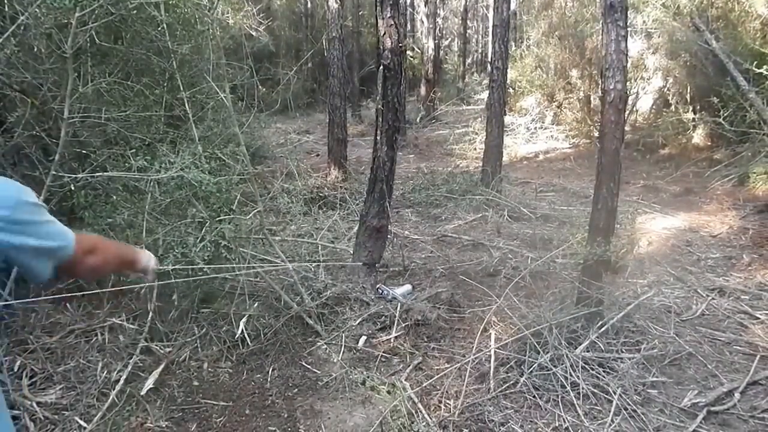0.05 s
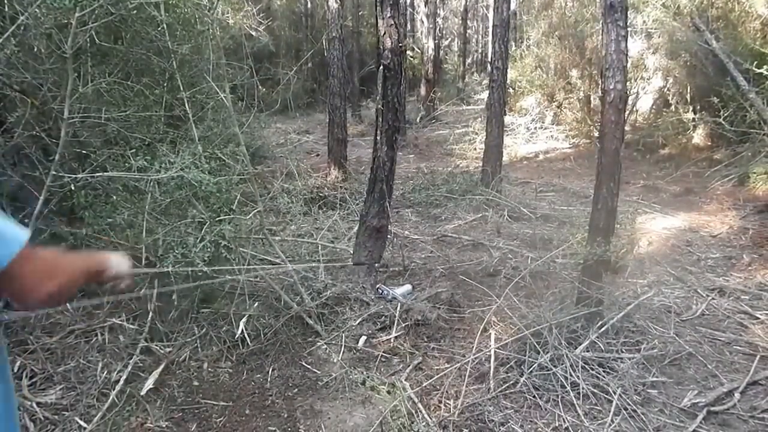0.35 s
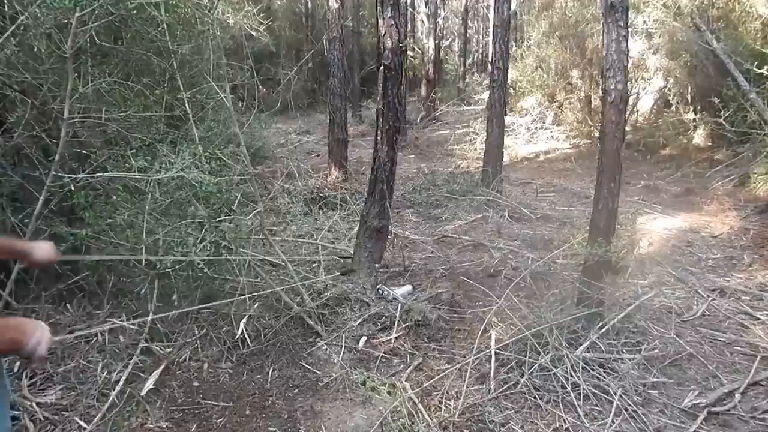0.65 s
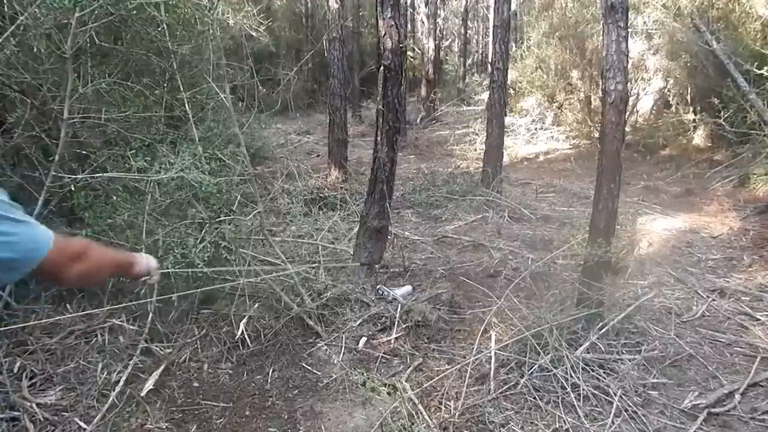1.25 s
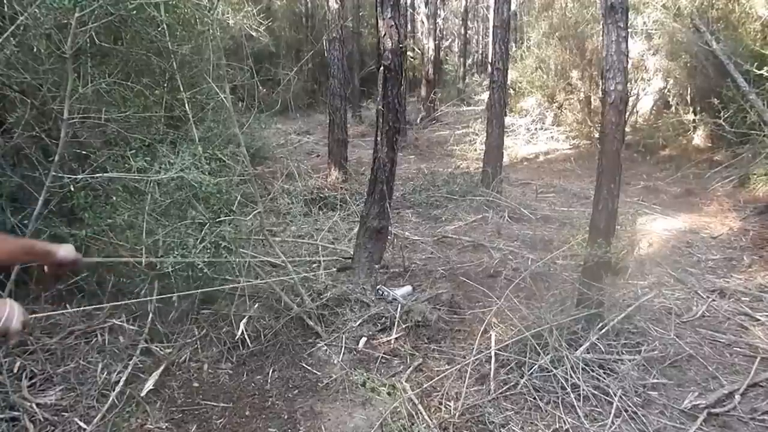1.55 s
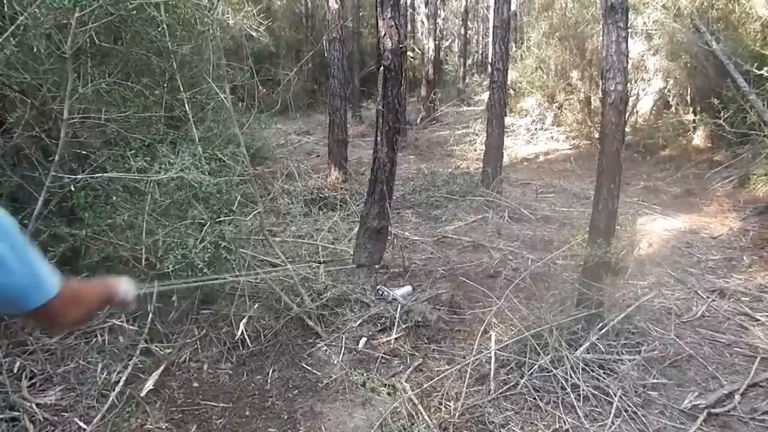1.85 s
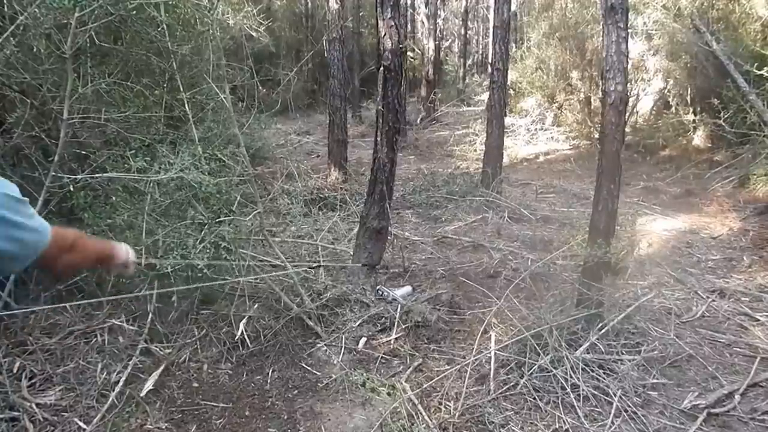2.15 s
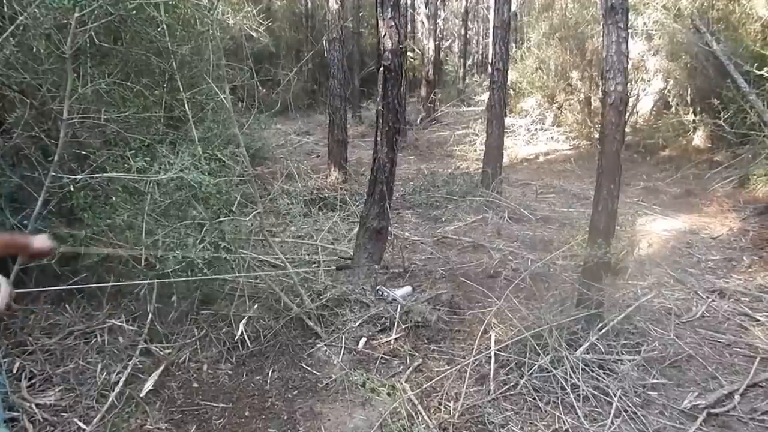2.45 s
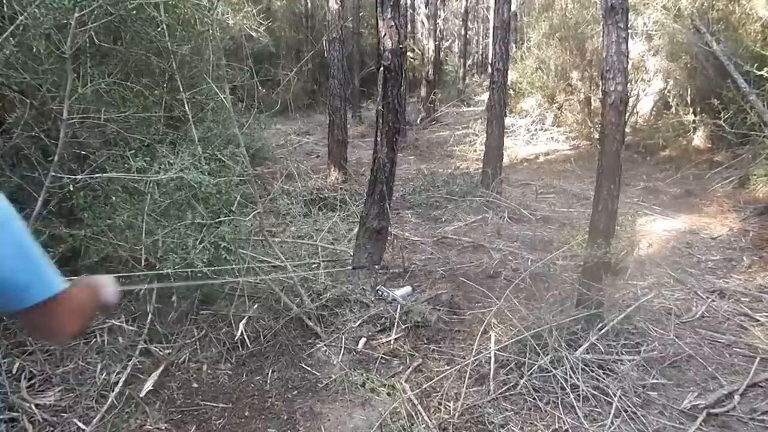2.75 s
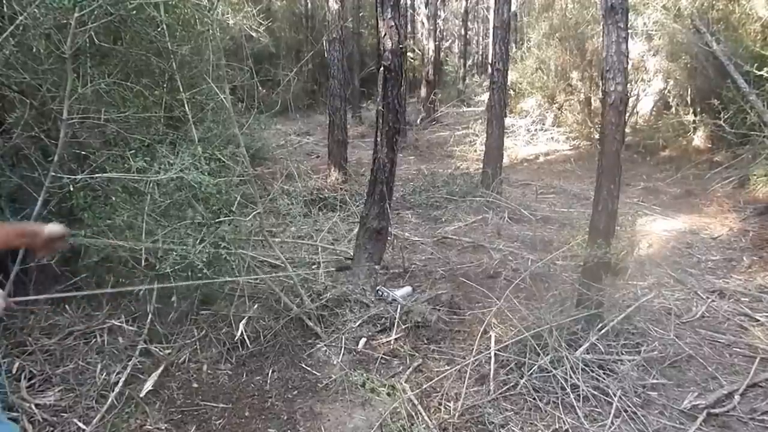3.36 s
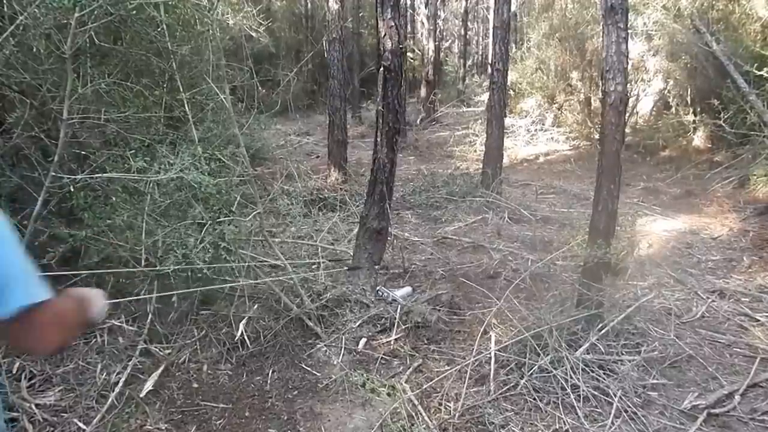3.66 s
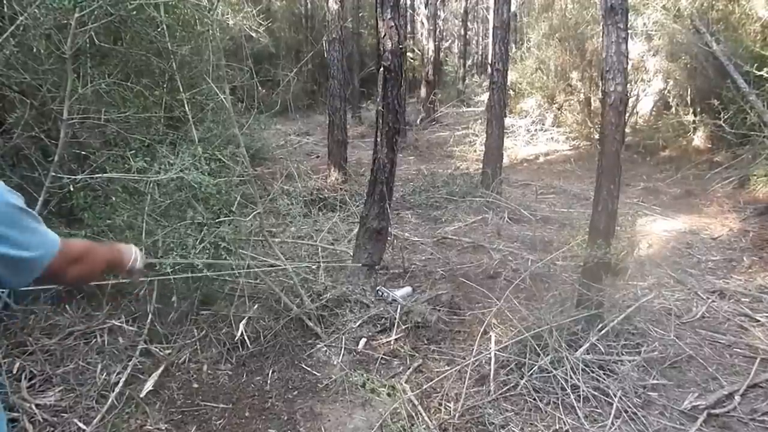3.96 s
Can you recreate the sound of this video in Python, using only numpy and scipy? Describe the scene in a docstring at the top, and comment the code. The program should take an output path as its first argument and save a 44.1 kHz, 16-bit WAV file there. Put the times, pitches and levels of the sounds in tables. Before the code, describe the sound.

A rope-pulled chain saw rasps back and forth through a tree trunk in quiet woods.

```python
"""Rope saw on a pine

Quiet woodland, stereo microphones on a camera a few metres from a pine. A rope-pulled chain saw is
drawn to and fro round the foot of the tree. On each pull the chain chatters in the cut about 200 times
a second: every bite clinks the links and knocks the trunk, fibres tear in between, and now and then
a tooth snags hard. Behind it lie faint echoes, a soft rush of air and the camera's thin steady whine."""
import sys
import numpy as np
from scipy import signal
from scipy.fft import rfft, irfft
from scipy.io import wavfile

SR = 44100
rng = np.random.default_rng(int(sys.argv[2]) if len(sys.argv) > 2 else 0)


def put_to_file(sound):
    """Save the sound as 16-bit audio at rate SR, in the file named by the first command-line argument."""
    columns = np.atleast_2d(sound).T  # one column per channel
    safe = np.clip(columns, -1, 1)
    whole_steps = np.round(safe * 32767)
    wavfile.write(sys.argv[1], SR, whole_steps.astype(np.int16))


N = 176400

# The trunk's answer to a knock: f/Hz, level/dB
TRUNK = [(60, -42.5), (140, -28.5), (165, 1), (200, -4.5), (290, 3.5), (350, -5), (400, -2), (435, -10),
         (505, -6.5), (570, -13.5), (630, -9.5), (690, -6.5), (800, -12.5), (940, -7.5), (1300, -15.5),
         (1800, -22.5), (4000, -70.5)]
# Hard snags: t/s, strength/dB, link ring/dB, crack/dB (crack minus ring sets the brightness)
SNAGS = [(0.2704, -27, -31, -43), (0.3033, -19.5, -35, -34), (0.3212, -23, -37, -32),
         (0.3451, -24, -31, -38), (0.5096, -13.5, -26, -29), (0.627, -27.5, -41, -45),
         (0.734, -53, -35, -41), (0.7652, -28.5, -36, -27), (0.7956, -24.5, -31.5, -30),
         (0.9024, -13, -23.5, -19.5), (0.9901, -11, -22.5, -22), (1.0376, -15.5, -33, -24),
         (1.3898, -14.5, -28, -26.5), (1.4439, -20, -24.5, -32), (1.4696, -15, -20, -34),
         (1.495, -12, -23, -24), (1.5263, -14.5, -34.5, -15.5), (1.7679, -15, -22.5, -23),
         (1.7933, -19.5, -28, -26), (1.8098, -15.5, -26.5, -28), (1.8462, -13.5, -22, -28.5),
         (1.8844, -13, -27, -24), (1.9065, -12.5, -19, -16), (1.9293, -11, -23, -20),
         (1.94, -9.5, -24, -18), (1.9514, -14, -30, -28), (2.0346, -20.5, -30, -28),
         (2.0625, -30, -44, -36), (2.3615, -12, -26, -19), (2.384, -15, -30, -22),
         (2.4395, -11.5, -23.5, -15), (2.4592, -16.5, -30, -25), (2.5476, -26.5, -38, -44),
         (2.7077, -14, -14, -47), (2.7352, -19, -28, -28), (2.7414, -26, -32, -5), (2.7755, -14, -21, -26),
         (2.8183, -12, -25, -28), (2.8686, -15, -20, -24), (2.9197, -15.5, -36.5, -17),
         (2.9716, -33, -46, -39), (3.1105, -31, -39, -47), (3.1333, -29.5, -34.5, -40),
         (3.1592, -25, -22, -47), (3.274, -11.5, -29.5, -20), (3.2983, -20, -27, -29),
         (3.3257, -13.5, -27, -24), (3.4457, -22, -37, -38), (3.585, -29.5, -35, -43),
         (3.7425, -15, -25, -25), (3.914, -21.5, -34, -46)]


def amp(db):
    """Decibels to gain."""
    return 10 ** (np.asarray(db) / 20)


def unit(x):
    """Scales to rms 1."""
    return x / np.sqrt(np.mean(x ** 2) + 1e-20)


def read(points, hz):
    """Reads a table on a log-frequency axis."""
    f, value = np.transpose(points)
    return np.interp(np.log(hz + 1), np.log(f + 1), value)


def add(mix, s, sound):
    """Adds a sound at time s."""
    part = mix[max(round(s * SR), 0):][:len(sound)]
    part += sound[:len(part)]


def colour(x, points, tilt_db=0, size=4096):
    """Minimum-phase filter with the given spectrum, tilted by tilt_db an octave about 3 kHz."""
    hz = np.abs(np.fft.fftfreq(size, 1 / SR))
    octaves = np.log2(np.clip(hz, 1200, 9000) / 3000)
    log_gain = np.log(amp(read(points, hz) + tilt_db * octaves))
    taps = np.fft.ifft(np.exp(np.conj(signal.hilbert(log_gain)))).real[:size // 2]
    return signal.oaconvolve(x, taps)[:len(x)]


def low_cut(x, hz, order):
    """Zero-phase high-pass filter."""
    return signal.sosfiltfilt(signal.butter(order, hz, "high", fs=SR, output="sos"), x)


def drift(width_hz):
    """Complex noise that wanders within the given bandwidth."""
    hz = np.fft.fftfreq(N, 1 / SR)
    white = rng.standard_normal(N) + 1j * rng.standard_normal(N)
    z = np.fft.ifft(np.fft.fft(white) / (1 + (2 * hz / width_hz) ** 2) ** 1.5)
    return z / np.std(z)


def arm(firm_rasp_db=-29, firm_chatter_db=-26, sag_oct_per_s=1.1):
    """Effort on the chain and load on the cut (1 on a firm pull), and the chatter's pitch in Hz."""
    # The swell of the stroke, one list a pull: t/s, rasp level/dB, chatter level/dB
    pulls = [
        [(0.0, -33.5, -35), (0.03, -32, -29), (0.05, -32, -30), (0.16, -65, -59.5)],
        [(0.2, -61, -58), (0.3, -42, -42), (0.38, -40, -33), (0.43, -37.5, -35), (0.5, -35.5, -28),
         (0.58, -38, -34), (0.69, -64, -54)],
        [(0.71, -66, -54), (0.74, -45, -46), (0.81, -40, -37), (0.91, -30.5, -27), (0.96, -32.5, -29),
         (1.04, -32, -30), (1.17, -67, -57.5)],
        [(1.21, -65, -61), (1.29, -42.5, -42), (1.39, -31, -29), (1.44, -27.5, -25), (1.49, -30.5, -24),
         (1.54, -33.5, -28.5), (1.67, -63, -55)],
        [(1.69, -59, -54), (1.77, -39.5, -37), (1.82, -33, -34), (1.94, -27.5, -28), (2.04, -40, -38),
         (2.07, -51, -47), (2.12, -64, -67.5)],
        [(2.16, -62, -62), (2.23, -50.5, -45), (2.33, -32.5, -28), (2.43, -28.5, -26), (2.48, -32, -27),
         (2.53, -40.5, -39), (2.6, -66.5, -53)],
        [(2.62, -59.5, -56), (2.72, -35.5, -36), (2.8, -27.5, -28), (2.87, -29, -26), (2.92, -32, -29),
         (2.97, -44, -37), (3.04, -64, -60.5)],
        [(3.07, -60, -59.5), (3.15, -42, -43), (3.25, -34.5, -27), (3.3, -29, -27), (3.37, -31.5, -23),
         (3.45, -42.5, -34), (3.51, -69, -57)],
        [(3.54, -62, -57.5), (3.59, -50.5, -48), (3.69, -31.5, -30.5), (3.79, -28, -25), (3.87, -38.5, -36),
         (3.92, -51, -41), (3.99, -66, -62)],
    ]
    # Chatter pitch at the loud middle of each pull: f/Hz
    pitches = [199.17, 227.7, 189.76, 207.5, 215.2, 225.9, 216.3, 236.4, 235]
    t = np.arange(N) / SR
    hz = np.full(N, float(pitches[0]))
    for pull, pitch_hz in zip(pulls, pitches):
        times, _, level_db = np.transpose(pull)
        middle = np.average(times, weights=amp(level_db) ** 2)
        begun = t >= times[0]
        # the chatter slows as the chain digs in
        hz[begun] = pitch_hz * 2 ** (-sag_oct_per_s * np.clip(t[begun] - middle, -.2, .06))
    s, rasp_db, chatter_db = np.concatenate(pulls).T
    effort = amp(np.interp(t, s, rasp_db) - firm_rasp_db)
    load = amp(np.interp(t, s, chatter_db) - firm_chatter_db)
    return effort, load, hz


def chatter(hz, evenness=0.27):
    """The chain grabs and slips at an unsteady rate: a complex swing whose crests are the bites."""
    wander = drift(width_hz=90)
    return wander / (abs(wander) + 1e-3) ** evenness * np.exp(2j * np.pi * np.cumsum(hz) / SR)


def growl(swing, octave_db=-15.5):
    """The chatter's own low note; the grab is lopsided, so it has an overtone."""
    octave = amp(octave_db) * abs(swing) * np.cos(2 * np.angle(swing))
    return unit(low_cut(swing.real, hz=150, order=8) + octave)


def bites(swing, jitter_s=0.0003, spread_db=5):
    """The teeth bite: one click of random size at each crest of the chatter."""
    crests = np.flatnonzero((swing.imag[:-1] < 0) & (swing.imag[1:] >= 0) & (swing.real[1:] > 0))
    late, size = rng.standard_normal((N, 2))[:len(crests)].T
    at = np.clip(crests + (late * jitter_s * SR).astype(int), 0, N - 1)
    clicks = np.zeros(N)
    clicks[at] = amp(spread_db * np.clip(size, -3, 1.7))
    return clicks


def clink(tilt_db, scrape_db, scrape_s=0.0012, detune=0.033, size=1500):
    """One tooth breaks through: a snap, a brief scrape and the short ring of the links."""
    # Modes of the links: f/Hz, t60/s, level/dB
    link_modes = [(1993, 0.0094, -15.5), (2155, 0.012, -20), (2553, 0.04, -28.5), (3530, 0.004, -33)]
    # Spectrum of one clink of the chain: f/Hz, level/dB
    clink_spectrum = [(300, -20.5), (1000, -16), (1500, -23.5), (1850, -7), (2150, 3.5), (2400, -2),
                      (2800, 2), (3600, 4), (4200, -4.5), (5000, -7), (5800, -20), (6800, -21),
                      (8000, -44.5), (11000, -54.5), (13000, -64.5), (16000, -46)]
    t = np.arange(size) / SR
    snap = (t == 0) + amp(scrape_db) * np.exp(-t / scrape_s) * rng.standard_normal(size)
    for hz, t60, db in link_modes:
        ring_hz = hz * (1 + detune * rng.standard_normal())
        snap += amp(db) * np.exp(-np.log(1000) * t / t60) * np.cos(2 * np.pi * ring_hz * t)
    return unit(colour(snap, clink_spectrum, tilt_db))


def chain(clicks, count=24):
    """Every bite sounds one of many clinks, from dull to bright."""
    which = rng.integers(0, count, N)
    out = np.zeros(N)
    for k, tilt_db in enumerate(np.linspace(-7, 7, count)):
        out += signal.oaconvolve(clicks * (which == k), clink(tilt_db, scrape_db=-7))[:N]
    return unit(out)


def tearing(swing, per_s=2500, spread_db=3, pulsing=0.22):
    """Dense tiny cracks of fibres, strongest around each bite."""
    breaks = rng.random(N) < per_s / SR
    sizes = amp(spread_db * np.minimum(rng.exponential(1, N), 4))
    signs = rng.choice([-1, 1], N)
    return breaks * sizes * signs * (1 + pulsing * np.cos(np.angle(swing)))


def judder(hz=36.26, depth_db=1.42):
    """A fluttering gain: links passing through the cut make the pull uneven."""
    flutter = drift(hz) * np.exp(2j * np.pi * hz * np.arange(N) / SR)
    return amp(depth_db * unit(flutter.real))


def rasp(clicks, cracks, effort, brighten=0.27):
    """Clinking links and tearing fibres; a harder pull is louder and brighter."""
    # Spectrum of tearing fibres: f/Hz, level/dB
    fibre_spectrum = [(300, -16), (1000, -9.5), (1500, -3), (1850, -0.5), (2170, 6.5), (2400, -3),
                      (2800, -6), (3600, -3.5), (4300, -7), (5000, -10), (5800, -14), (6800, -12),
                      (8000, -18.5), (11000, -30.5), (13000, -19.5), (16000, -26)]
    links = amp(-29.5) * chain(clicks)
    fibres = amp(-30.5) * unit(colour(cracks, fibre_spectrum))
    both = effort * (links + fibres)
    return both + (effort ** brighten - 1) * low_cut(both, hz=4000, order=1)


def trunk_knocks(clicks, cracks, effort, load, load_share=0.19, cracks_db=8.5):
    """Bites and cracks knock the trunk, following the effort more than the load."""
    force = (effort ** (1 - load_share) * load ** load_share) ** 0.79
    blows = unit(clicks) + amp(cracks_db) * unit(cracks)
    return force * unit(colour(blows, TRUNK))


def spread(x, change_hz=70, size=64):
    """The treble reaches the two microphones by different, ever changing paths."""
    # Stereo width at the microphones: f/Hz, side minus mid/dB
    width = [(200, -20), (700, -15.5), (1500, -10.5), (2600, -20), (4200, -6.5), (6000, -4.5), (9000, 2),
             (14000, 1)]
    scatter = irfft(np.exp(2j * np.pi * rng.random(size // 2 + 1)))
    scattered = signal.hilbert(signal.oaconvolve(x, scatter)[:N])
    paths = scattered * np.exp(1j * np.angle(drift(change_hz)))
    side = colour(paths.real, width)
    return np.array([x + side, x - side])


def tree_echoes(x, level_db=-24, delay_s=0.0085):
    """Faint scattered echoes from the trees, for one microphone."""
    # Decay of the echo among the trees: f/Hz, t60/s
    decay_times = [(150, 0.29), (1000, .6), (3000, 0.88), (12000, 0.59)]
    taps = rng.standard_normal(SR) * (rng.random(SR) < .05) * (np.arange(SR) > delay_s * SR)
    hz, t, bands = signal.stft(taps, SR, nperseg=256)
    decay = np.exp(-np.log(1000) * t / read(decay_times, hz)[:, None])
    tail = signal.istft(bands * decay, SR, nperseg=256)[1]
    return amp(level_db) * signal.oaconvolve(x, tail / np.linalg.norm(tail))[:N]


def air(level_db=-48.5, side_db=-10):
    """Steady soft rush of the woodland, mostly common to both microphones."""
    # Spectrum of still woodland air: f/Hz, level/dB
    air_spectrum = [(20, -11), (50, 5), (110, 6.5), (150, -2.5), (250, -4), (500, -7), (950, -10),
                    (1400, -12), (2100, -17.5), (3500, -25.5), (6000, -25), (10000, -29.5), (16000, -24.5)]
    mid, side = (unit(colour(rng.standard_normal(N), air_spectrum)) for _ in range(2))
    return amp(level_db) * (mid + amp(side_db) * np.array([side, -side]))


def camera_whine(hz=14835):
    """The camera puts one thin steady tone on both channels, stronger on the right."""
    # Strength of the whine, left then right: rms level/dB
    levels = [-66, -59.5]
    return np.sqrt(2) * amp(levels)[:, None] * np.sin(2 * np.pi * hz * np.arange(N) / SR)


def stick_slip(dip_db=-3, stall_s=0.018):
    """Gain of the running chain: it sticks briefly before each snag."""
    t, gain_db = np.arange(N) / SR, np.zeros(N)
    for s, *_ in SNAGS:
        gain_db = np.minimum(gain_db, dip_db * np.exp(-((t - s + stall_s / 2) / stall_s) ** 2))
    return amp(gain_db)


def snags(clink_db=-0.5, knock_db=-13, delay_s=0.001122):
    """A tooth catches hard: a loud clink, dull or sharp, and a knock in the trunk."""
    out = np.zeros(N)
    knock = colour(signal.unit_impulse(SR // 20), TRUNK)
    for s, db, ring_db, crack_db in SNAGS:
        ring = clink(tilt_db=0.92 * (crack_db - ring_db + 5), scrape_db=-8.5)
        add(out, s + delay_s, amp(db + clink_db) * ring / abs(ring).max())
        add(out, s + delay_s, amp(db + knock_db) * knock / abs(knock).max())
    return out


def saw():
    """The sound at the cut: rasp, knocks and growl driven by the pull, with the snags on top."""
    effort, load, hz = arm()
    swing = chatter(hz)
    clicks, cracks = bites(swing), tearing(swing)
    unevenness = stick_slip() * judder()
    cutting = rasp(clicks, cracks, effort) + amp(-28.5) * trunk_knocks(clicks, cracks, effort, load)
    low_note = amp(-26.5) * load ** 1.314 * growl(swing)
    return unevenness * cutting + low_note + snags()


def scene():
    """From a few metres off: the saw, its echoes among the trees and the air."""
    cut = saw()
    return spread(cut) + np.array([tree_echoes(cut), tree_echoes(cut)]) + air()


def record(dry):
    """At the camera: slightly unequal microphones, its own whine and a band limit at 15.8 kHz."""
    # Balance of the microphones: f/Hz, left minus right/dB
    balance = [(100, .7), (2500, .4), (5500, 1.5), (9000, 0), (13000, -4), (16000, -4)]
    balance_db = read(balance, np.fft.rfftfreq(N, 1 / SR))
    heard = irfft(rfft(dry) * amp(np.outer([.5, -.5], balance_db)), N)
    band_limit = signal.firwin(511, 15800, window=("kaiser", 9), fs=SR)
    return signal.oaconvolve(heard + camera_whine(), band_limit[None], "same")


dry = scene()
out = record(dry)
put_to_file(out)
```